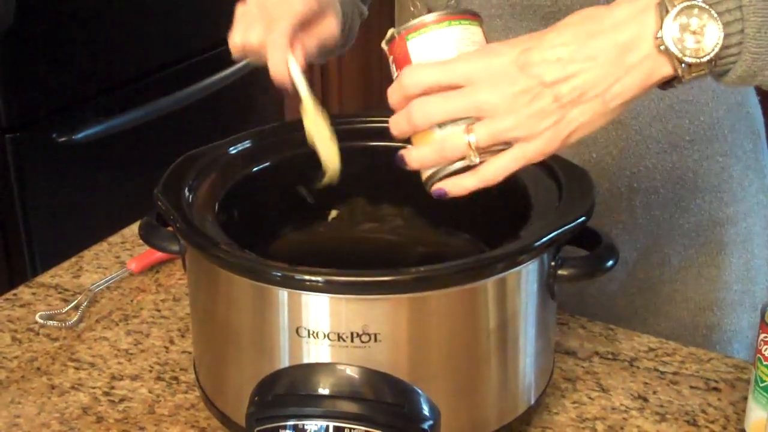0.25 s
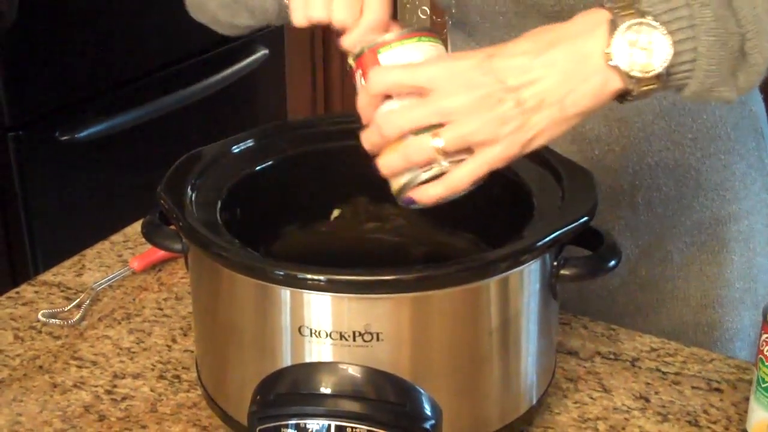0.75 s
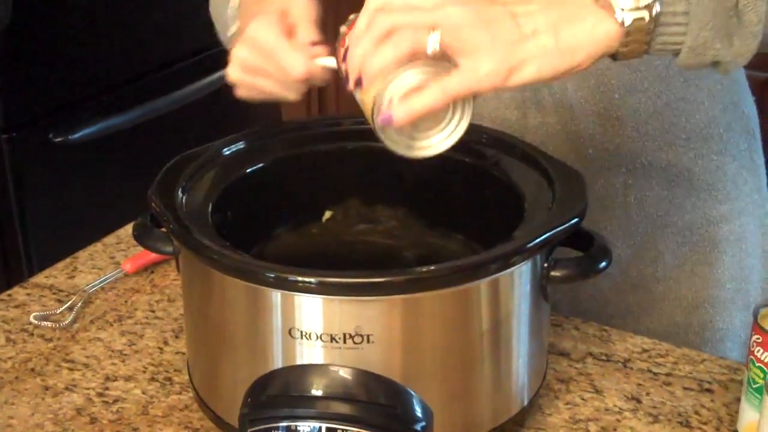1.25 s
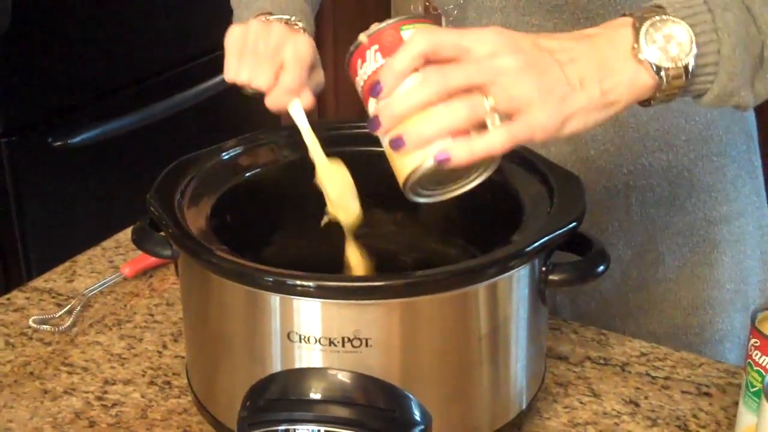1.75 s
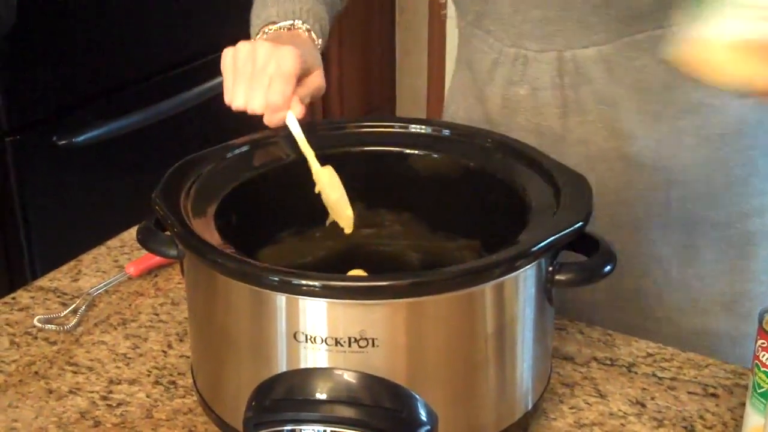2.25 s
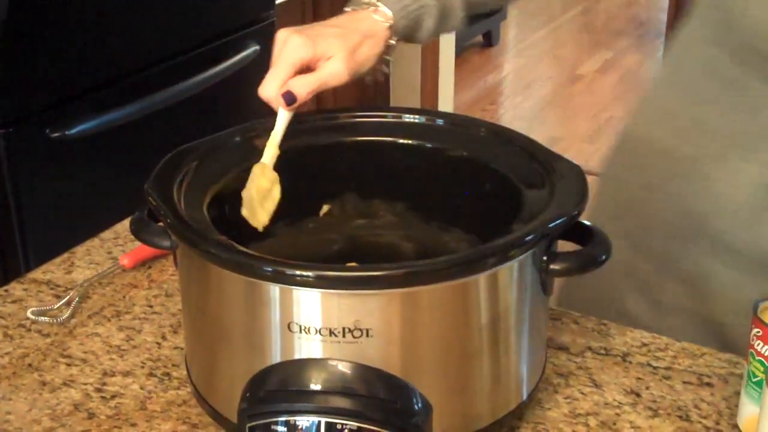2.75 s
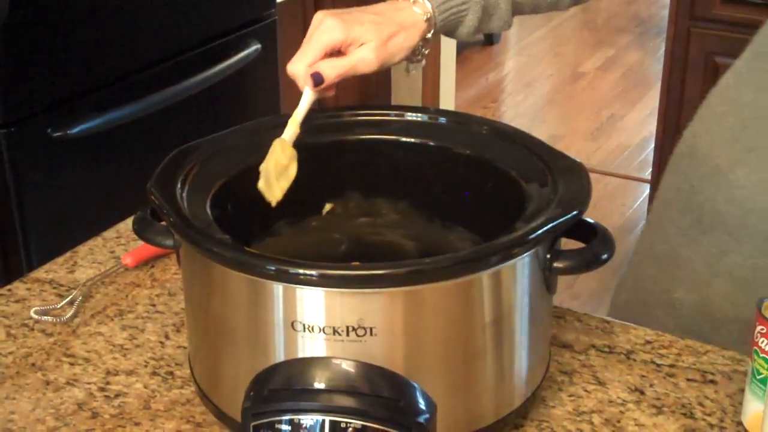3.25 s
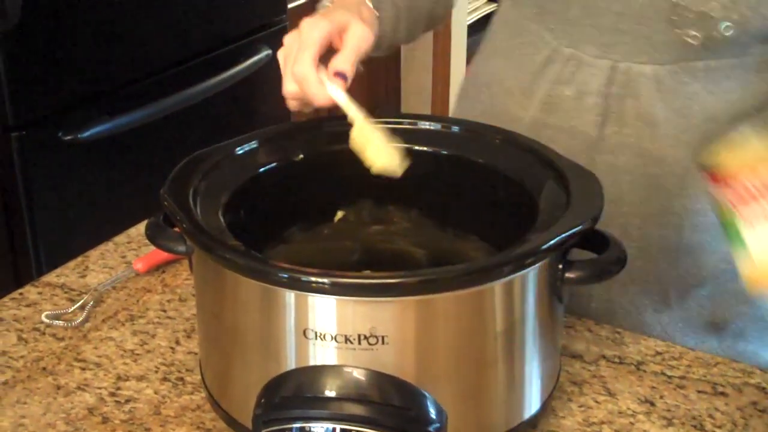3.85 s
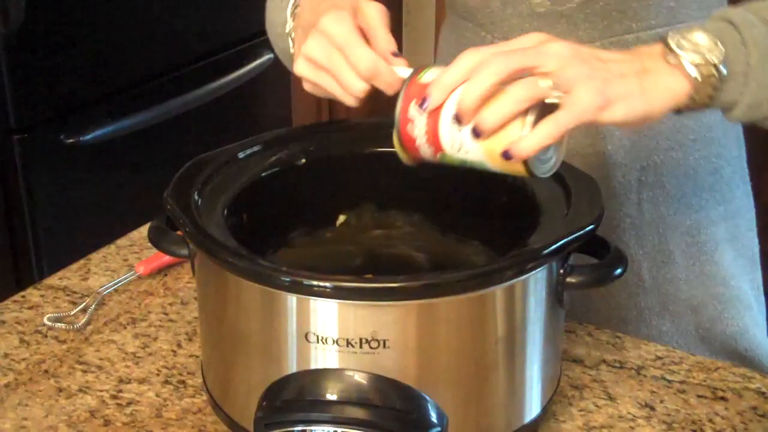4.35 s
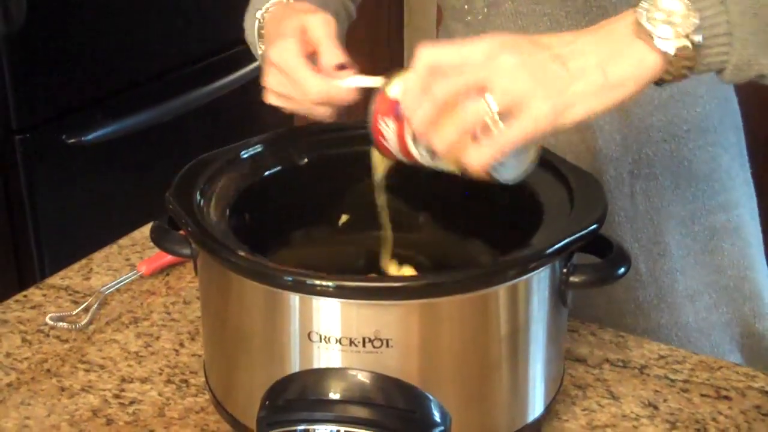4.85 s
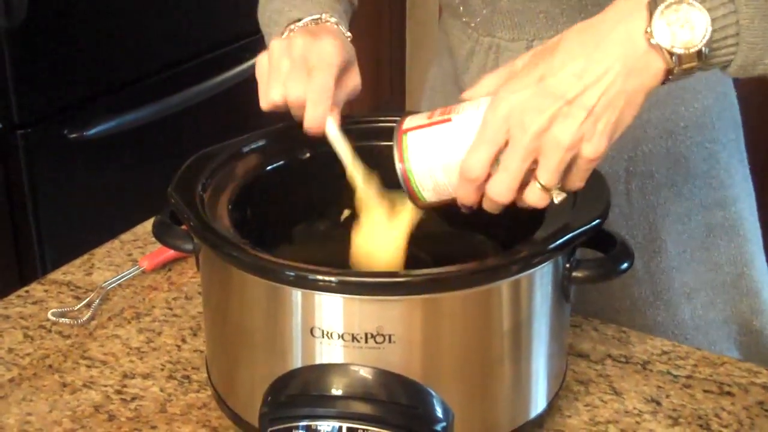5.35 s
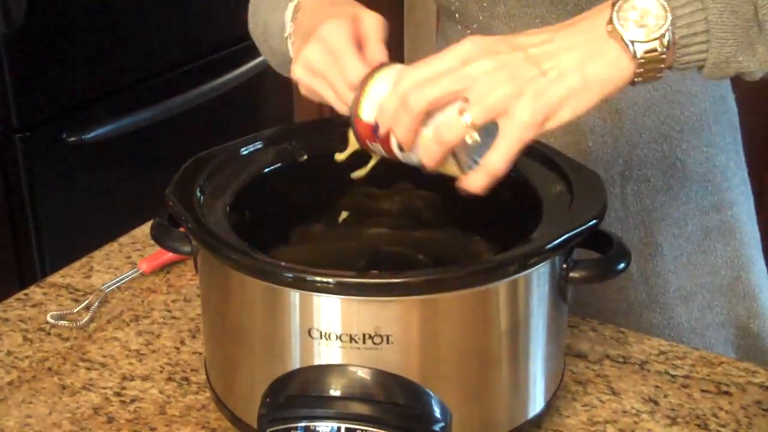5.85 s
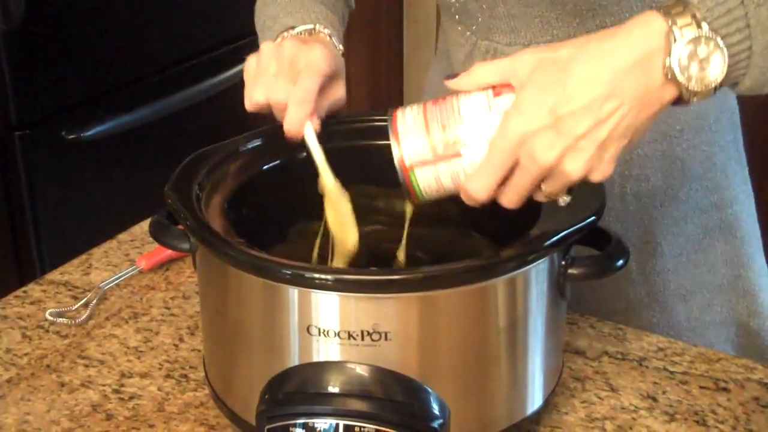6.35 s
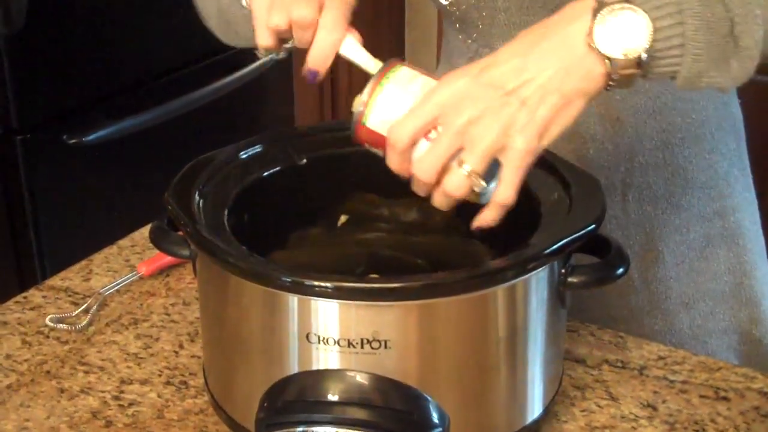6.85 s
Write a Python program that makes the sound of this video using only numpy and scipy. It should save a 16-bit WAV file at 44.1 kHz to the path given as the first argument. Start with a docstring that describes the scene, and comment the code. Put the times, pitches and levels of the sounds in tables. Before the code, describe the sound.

A spatula digs thick soup out of a tin can with soft wet smacks and a small pop. It raps three times on the rim of a stoneware slow cooker, then the empty can clonks onto a stone counter. A sleeve rustles faintly, and a second can is scraped out with sticky squelches, clicks and plops. The sounds come from across the counter in a small kitchen with a quiet hum.

```python
"""Thick soup smacks, squelches and plops as a spatula digs it out of a tin can over a slow cooker.
Three raps of the spatula ring the stoneware pot, the empty can clonks onto a stone counter,
then a second can is scraped out. Paste films tear, air pockets pop, suction whistles past a lump.
A sleeve rustles; a small, hard kitchen answers over a quiet, steady hum of air."""
import sys
import numpy as np
from scipy import signal
from scipy.fft import rfft, irfft, next_fast_len
from scipy.io import wavfile
from scipy.ndimage import uniform_filter1d

SR = 44100
rng = np.random.default_rng(int(sys.argv[2]) if len(sys.argv) > 2 else 0)


def waveform_to_disk(signal):
    """Save audio, clipped to [-1, 1], as 16-bit WAV at the path in sys.argv[1]."""
    frames = np.transpose(np.atleast_2d(signal))
    scaled = np.clip(frames, -1, 1) * 32767
    samples = np.round(scaled).astype(np.int16)
    wavfile.write(sys.argv[1], SR, samples)


N = 312669
TIME_S = np.arange(N) / SR
AGE_S = np.arange(SR // 2) / SR  # time since a blow

# cooker body spectrum: (frequency [Hz], relative density [dB])
COOKER_THUD = [(60, -39.5), (125, -24), (165, -3), (230, -8.5), (350, 3), (540, -6.5), (680, -13.5),
               (1500, -27), (5000, -61)]


def smacks(snap_db=-5, body_db=-3, tick_db=1):
    """A paste film tears with a sharp tick and a short spray; deeper in the can it has more body."""
    # (time [s], relative snap level [dB], relative body level [dB], t60 [s])
    tears = [(0.091, -57, -52.5, 0.071), (0.6393, -65, -51, .03), (0.7386, -50.5, -51.5, .028),
             (1.0199, -38.5, -53, 0.011), (1.1332, -44.5, -42, 0.048), (1.4397, -51, -58, .018),
             (2.596, -60, -46, .018), (3.7128, -53.5, -61, 0.022), (4.4556, -50, -46, .024),
             (4.6324, -42.5, -49, .014), (4.7758, -37.5, -41.5, .035), (4.780, -31.5, -43.5, 0.03),
             (4.8722, -39, -47, .045), (5.1928, -48, -53, 0.013), (5.8165, -48.5, -70, 0.018),
             (5.910, -40, -68, .019), (5.918, -42.5, -68, .015), (6.0227, -52, -40, 0.018),
             (6.2109, -30.5, -37, 0.012), (6.5232, -49, -62, .012), (6.5736, -43, -44, 0.034),
             (6.9345, -31.5, -42, 0.024), (6.9936, -40.5, -45, .018)]
    # both: (frequency [Hz], relative density [dB])
    snap_spectrum = [(1500, -44), (3500, 5.5), (5000, 0.5), (7000, 3.5), (10500, 9.5), (14000, -7)]
    body_spectrum = [(300, -11), (1000, -10.5), (1700, -2.5), (2400, -3), (3100, -7.5), (4000, -1.5),
                     (5400, -9), (8000, -37)]
    out = np.zeros(N)
    tick = 1 + amp(tick_db) * fade(t60_s=0.0043)
    for time_s, bright_db, hollow_db, t60_s in tears:
        snap = amp(snap_db + bright_db) * burst(snap_spectrum, t60_s)
        body = amp(body_db + hollow_db) * burst(body_spectrum, t60_s)
        add(out, time_s, tick * (snap + body))
    return radiated(out, low_hz=400)


def squelches(release_s=0.006):
    """Air sucks past the dragging blade in dense, tiny ruptures that ring the gap in the can."""
    # (start [s], end [s], level [dB], attack [s])
    drags = [(1.017, 1.13, -68, .01), (4.415, 4.480, -57.5, .003), (4.544, 4.598, -57.5, .045),
             (4.873, 4.888, -48.5, 0.0023), (5.217, 5.283, -47.5, 0.015), (6.021, 6.091, -47.5, .002),
             (6.085, 6.215, -48, 0.051)]
    # (frequency [Hz], relative density [dB])
    gap_spectrum = [(350, -25), (700, -7), (1000, -15), (1450, 0.5), (1850, -8), (2400, 1.5), (2950, -6.5),
                    (3700, -3), (5000, -16.5), (9000, -18), (14000, -25)]
    force = sum(amp(db) * stroke(start_s, end_s, attack_s, release_s)
                for start_s, end_s, db, attack_s in drags)
    return force * grains(gap_spectrum, rate_hz=2500, spread_db=0.5)


def can_and_pocket_rings(waver_oct=0.048):
    """A faint, fading ring of the tin can at the start; then air pockets in the paste pop and ring."""
    # first row is the can: (time [s], level [dB], frequency [Hz], t60 [s], glide [octaves])
    rings = [(0.003, -62.5, 2400, .4, 0), (1.1337, -30, 2617, 0.028, -0.22),
             (1.134, -32, 2280, .034, -0.26), (4.42, -51.5, 2054, .2, -1.7),
             (4.455, -39, 1356, 0.069, -0.58), (4.668, -56.5, 551, 0.25, .2), (4.778, -44, 1004, 0.076, 0),
             (5.25, -47.5, 1400, 0.13, -.05), (6.213, -37, 6340, .12, -0.14), (6.574, -43, 6740, .05, -.1)]
    out = np.zeros(N)
    for time_s, db, hz, t60_s, glide_oct in rings:
        bend_oct = glide_oct * np.minimum(AGE_S / t60_s, 1) + waver_oct * jitter(window=25)
        add(out, time_s, amp(db) * sine(hz * 2 ** bend_oct) * fade(t60_s) * onset(rise_s=0.00099))
    return out


def lump_suction(gap_hz=2330, gap_bend=0.1, hollow_hz=675):
    """A lump pulls free: suction sharpens a whistle in the gap, then the air in the can rings."""
    suction = swell(peak_s=6, db=-38.5, rise_s=0.16, fall_s=0.11)
    whistle_hz = gap_hz * (1 + gap_bend * np.sqrt(suction / suction.max()))
    whistle = suction * wavering(whistle_hz, waver=0.03)
    hollow = swell(peak_s=6.222, db=-39, rise_s=0.32, fall_s=0.105) * wavering(hollow_hz, waver=0.0543)
    return whistle + hollow


def crackle(ramp_s=0.23):
    """Smeared soup ticks sparsely while worked and fizzes where it peels off the tin."""
    # (start [s], end [s], level [dB])
    smears = [(0.1, 1.1, -76.5), (4.35, 7.09, -72)]
    # (time [s], level [dB], t60 [s])
    peels = [(1.085, -54, 0.13), (1.443, -52, 0.093), (1.716, -49.5, 0.22), (4.782, -44, .09),
             (4.893, -43.5, 0.18), (5.925, -60, 0.66), (6.938, -48, .1), (7.040, -54.5, 0.23)]
    # (frequency [Hz], relative density [dB])
    fizz_spectrum = [(2500, -39.5), (5000, -12), (8000, -2.5), (11500, 1.5), (14000, -3)]
    smearing = sum(amp(db) * stroke(start_s, end_s, ramp_s, ramp_s) for start_s, end_s, db in smears)
    peeling = np.zeros(N)
    for time_s, db, t60_s in peels:
        add(peeling, time_s, amp(db) * fade(t60_s) * onset(rise_s=0.01156))
    ticks = grains(fizz_spectrum, rate_hz=60, spread_db=6)
    fizz = grains(fizz_spectrum, rate_hz=1800, spread_db=5)
    return smearing * ticks + peeling * fizz


def pot_raps(ring_db=-12.5, clack_db=-10.5, thud_db=-27):
    """Each rap on the rim rings the stoneware, clacks the spatula and shakes the cooker."""
    # (time [s], relative level [dB], thud offset [dB])
    raps = [(1.9269, -11, -0.5), (2.0798, -10, -2.5), (2.2080, -9.5, 4)]
    # (frequency [Hz], relative level [dB], t60 [s])
    pot_modes = [(168, -24, .12), (315, -15, .1), (357, -15, .24), (405, -16, .1), (823, -13, .08),
                 (1045, -10, .06), (2247, -2, .07), (2613, -4, .07), (2874, -4, .09), (3020, -3, .08),
                 (3197, -6, .25), (3570, -4, .07), (3652, -3, .06), (3733, -6, .05), (3862, -2, .06),
                 (3989, -4, .06), (4713, -4, .05), (5254, -12, .16), (5439, -9, .05), (6007, -9, .06),
                 (6820, -15, .14), (7646, -15, .14), (8519, -18, .1), (10540, -23, .1), (11668, -22, .1)]
    # (frequency [Hz], relative density [dB])
    clack_spectrum = [(200, -43), (600, -1.5), (1800, -4), (2400, -1), (3400, 5), (5500, -5.5),
                      (7500, -10.5), (11000, -16.5), (14000, -28)]
    out = np.zeros(N)
    for time_s, db, low_db in raps:
        pot = amp(ring_db) * ring(pot_modes, scatter_db=0, waver=0.005)
        clack = amp(clack_db) * burst(clack_spectrum, t60_s=0.068)
        contact = np.vstack([pot, clack]) * onset(rise_s=0.0004)
        thud = amp(thud_db + low_db) * burst(COOKER_THUD, t60_s=0.15) * onset(rise_s=0.003)
        add(out, time_s, amp(db) * kitchen(np.vstack([contact, thud]), tail_db=-4, early_db=-1))
    return radiated(out, low_hz=159.4)


def can_set_down(time_s=3.0546, ring_db=-15.6, crack_db=-19.1):
    """The rim cracks on the stone; the base and the air inside give a hollow clonk."""
    # (frequency [Hz], relative level [dB], t60 [s])
    can_modes = [(697, -1, .07), (735, 3, .12), (829, -8, .07), (870, -11, .09), (934, -2, .11),
                 (975, -3, .06), (1954, -10, .16), (2480, -6, .07), (2562, -6, .08), (2694, -10, .07),
                 (3221, -13, .09), (3370, -12, .05), (3523, -15, .05), (3789, -14, .06), (3956, -9, .08),
                 (4944, -7.5, .07), (5014, -11, .08), (5219, -17, .11), (6023, -22, .05), (7964, -14, .04),
                 (8430, -17, .06)]
    # (frequency [Hz], relative density [dB])
    crack_spectrum = [(50, -6.5), (130, -18), (400, -15), (680, -1), (950, -2.5), (1250, -5), (2100, -1),
                      (2500, 5.5), (2950, -0.5), (3400, 5), (4050, 7), (4500, -2), (5050, 5), (5600, -4),
                      (7200, -11), (8200, -1.5), (9500, -7), (12000, -6), (14000, -10)]
    out = np.zeros(N)
    clonk = ring(can_modes, scatter_db=0.5, waver=0.0036) * onset(rise_s=0.0012)
    crack = burst(crack_spectrum, t60_s=0.053) * onset(rise_s=0.00055)
    add(out, time_s, amp(ring_db) * kitchen(radiated(clonk, low_hz=540), tail_db=-7, early_db=-8))
    add(out, time_s, amp(crack_db) * kitchen(crack[None], tail_db=-2, early_db=-8.5))
    return out


def cooker_bumps():
    """Soft contacts thud the cooker."""
    # (time [s], level [dB])
    bumps = [(0.090, -61), (0.113, -57.5), (2.357, -47), (2.595, -53)]
    out = np.zeros(N)
    for time_s, db in bumps:
        add(out, time_s, amp(db) * burst(COOKER_THUD, t60_s=0.15))
    return out


def sleeve():
    """A knitted sleeve brushes the body as the arm reaches out."""
    # (frequency [Hz], relative density [dB])
    cloth_spectrum = [(500, -12.5), (1500, -5), (5700, -7), (14000, -19)]
    reach = swell(peak_s=4, db=-58, rise_s=0.8, fall_s=0.58)
    return reach * coloured(rng.standard_normal(N), cloth_spectrum)


def room_air(air_db=-65, waver_hz=3):
    """Steady rush of air with faint, wavering appliance tones."""
    # (frequency [Hz], relative density [dB])
    air_spectrum = [(10, -20.5), (25, 5), (45, -1), (80, -1), (140, -7), (200, -2.5), (300, -5),
                    (410, -3.5), (700, -4.5), (1330, -6), (2960, -14), (8480, -20), (12700, -19.5),
                    (14000, -27)]
    # (frequency [Hz], rms level [dB])
    tones = [(402, -79.5), (702, -79), (805, -83), (1306, -80.5)]
    hum = sum(amp(db) * np.sqrt(2) * sine(hz + waver_hz * jitter(window=4000, n=N)) for hz, db in tones)
    return amp(air_db) * coloured(rng.standard_normal(N), air_spectrum) + hum


def kitchen(rows, tail_db, early_db):
    """Spreads each row's energy over direct sound, pot and counter echoes and room tail; sums the rows."""
    # (frequency [Hz], t60 [s])
    room_decay = [(150, 0.25), (400, .52), (1000, 0.51), (2800, .43), (5000, 0.39), (8000, 0.34),
                  (13000, .25)]
    n = len(AGE_S)
    hz, time_s, bands = signal.stft(rng.standard_normal(SR), SR, nperseg=256)
    decay = np.exp(-np.log(1000) * time_s / along(room_decay, hz)[:, None])
    tail = signal.istft(bands * decay, SR, nperseg=256)[1][:n] * onset(rise_s=0.0047)
    reflections = rng.standard_normal(n) * (rng.random(n) < 0.05)
    early = reflections * fade(t60_s=0.04) * (AGE_S > 0.001)
    echo = amp(tail_db) * tail / np.linalg.norm(tail) + amp(early_db) * early / np.linalg.norm(early)
    heard = rows + signal.fftconvolve(rows, echo[None], axes=1)[:, :rows.shape[1]]
    gain = np.linalg.norm(rows, axis=1) / np.linalg.norm(heard, axis=1)
    return np.sum(heard * gain[:, None], axis=0)


def ring(modes, scatter_db, waver):
    """One blow, one row per mode; contact chatter shakes each pitch by the fraction waver."""
    hz, db, t60_s = np.transpose(modes)[:, :, None]
    strength = amp(db + scatter_db * rng.standard_normal(hz.shape))
    pitch_hz = hz * (1 + waver * np.array([jitter(window=30) for _ in modes]))
    cycles = np.cumsum(pitch_hz, axis=1) / SR + rng.random(hz.shape)
    return strength * fade(t60_s) * np.sin(2 * np.pi * cycles)


def burst(spectrum, t60_s):
    """Decaying puff of coloured noise."""
    return coloured(rng.standard_normal(len(AGE_S)), spectrum) * fade(t60_s)


def grains(spectrum, rate_hz, spread_db):
    """Tiny ruptures of random time and size, rms 1."""
    sizes = amp(spread_db * np.clip(rng.standard_normal(N), -2, 2)) * rng.choice([-1, 1], N)
    return coloured(sizes * (rng.random(N) < rate_hz / SR), spectrum)


def wavering(hz, waver):
    """Tone with its pitch shaken by the fraction waver."""
    return sine(hz * (1 + waver * jitter(window=40, n=N)))


def sine(pitch_hz):
    return np.sin(2 * np.pi * np.cumsum(pitch_hz) / SR)


def jitter(window, n=len(AGE_S)):
    """Noise smoothed over window samples, rms 1."""
    return unit_rms(uniform_filter1d(rng.standard_normal(n), size=window))


def radiated(x, low_hz):
    """A small body radiates little below low_hz."""
    return signal.sosfilt(signal.butter(4, low_hz, "high", fs=SR, output="sos"), x)


def coloured(x, spectrum):
    """x shaped by a spectrum, rms 1."""
    size = next_fast_len(len(x))
    gain = amp(along(spectrum, np.fft.rfftfreq(size, 1 / SR)))
    return unit_rms(irfft(rfft(x, size) * gain, size)[:len(x)])


def along(points, hz):
    """Interpolates (frequency [Hz], value) points on a log axis."""
    knots_hz, values = np.transpose(points)
    return np.interp(np.log(hz + 1), np.log(knots_hz), values)


def stroke(start_s, end_s, attack_s, release_s):
    """Envelope: rise, hold until end_s, fall."""
    return np.clip((TIME_S - start_s) / attack_s, 0, 1) * np.clip(1 - (TIME_S - end_s) / release_s, 0, 1)


def swell(peak_s, db, rise_s, fall_s):
    """Envelope: up 60 dB in rise_s, down 60 dB in fall_s."""
    return amp(db - 60 * np.maximum((peak_s - TIME_S) / rise_s, (TIME_S - peak_s) / fall_s))


def onset(rise_s):
    return 1 - np.exp(-AGE_S / rise_s)


def fade(t60_s):
    return np.exp(-np.log(1000) * AGE_S / np.maximum(t60_s, 1e-3))


def amp(db):
    return 10 ** (np.asarray(db) / 20)


def unit_rms(x):
    return x / np.sqrt(np.mean(x ** 2) + 1e-20)


def add(track, time_s, sound):
    part = track[max(round(time_s * SR), 0):][:len(sound)]
    part += sound[:len(part)]


def scene():
    """Mono mix, heard from across the counter."""
    snaps = kitchen(smacks()[None], tail_db=-3.5, early_db=-4)
    paste = kitchen(np.array([squelches(), crackle(), cooker_bumps()]), tail_db=-5, early_db=-4.5)
    tones = kitchen(np.array([can_and_pocket_rings(), lump_suction()]), tail_db=-9.5, early_db=-5)
    return (snaps + paste + tones + pot_raps() + can_set_down() + sleeve() + room_air())[None]


def record(dry):
    """Steep low-pass."""
    cutoff_hz = 14300
    size = next_fast_len(N + SR // 2)
    hz = np.fft.rfftfreq(size, 1 / SR)
    return irfft(rfft(dry, size) / np.sqrt(1 + (hz / cutoff_hz) ** 240), size)[..., :N]


dry = scene()
out = record(dry)
waveform_to_disk(out)
```